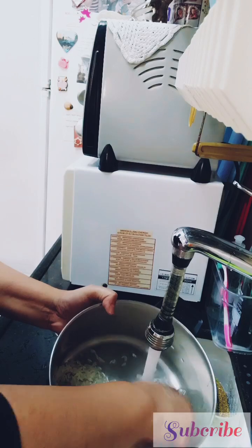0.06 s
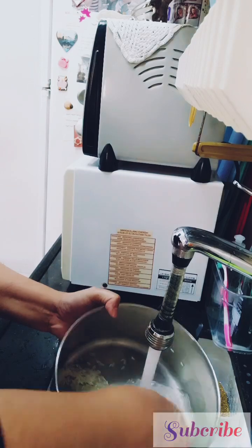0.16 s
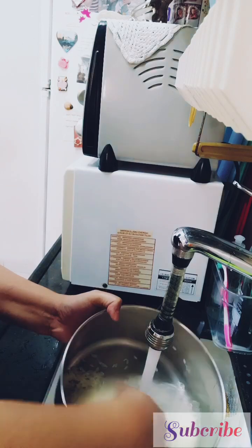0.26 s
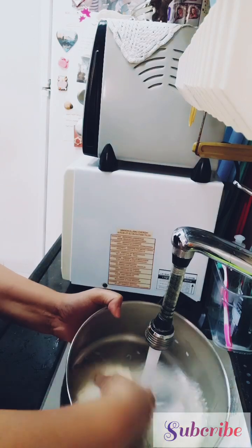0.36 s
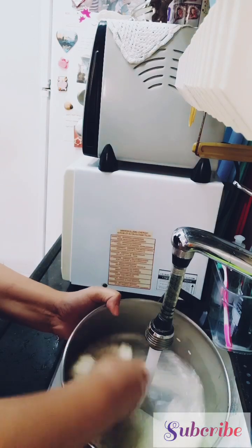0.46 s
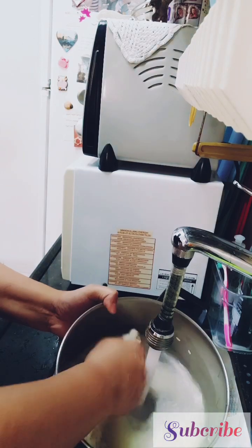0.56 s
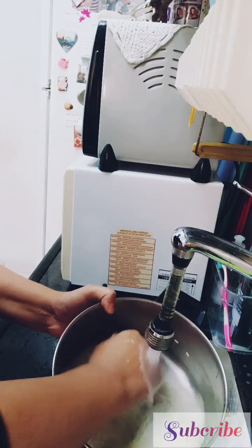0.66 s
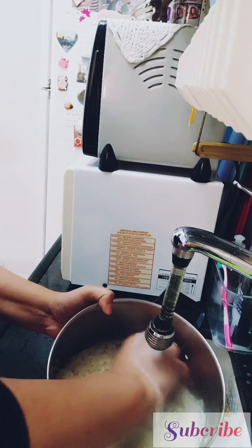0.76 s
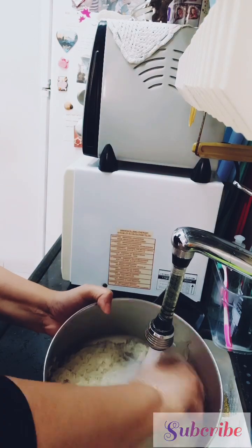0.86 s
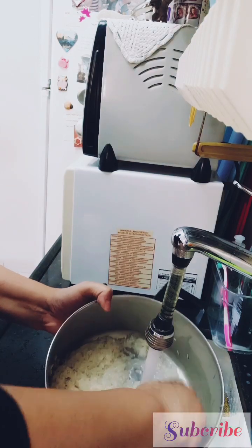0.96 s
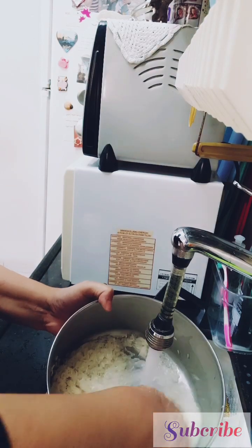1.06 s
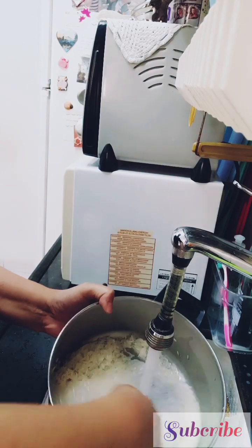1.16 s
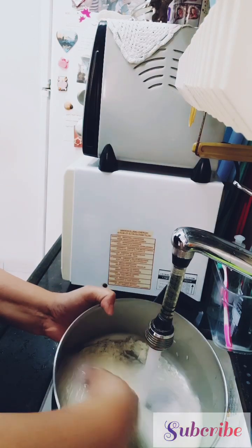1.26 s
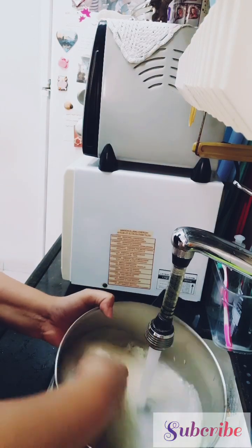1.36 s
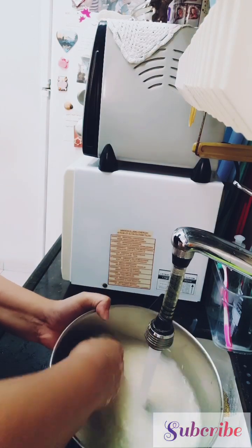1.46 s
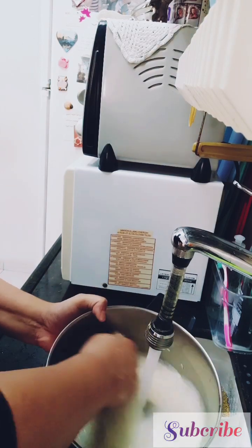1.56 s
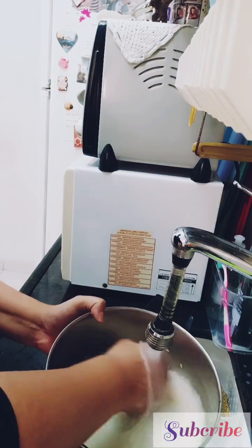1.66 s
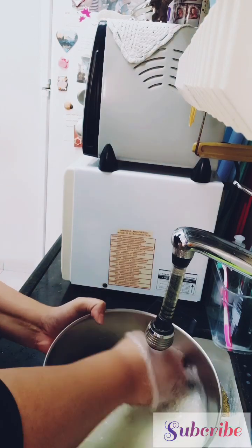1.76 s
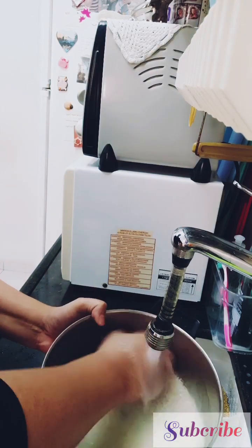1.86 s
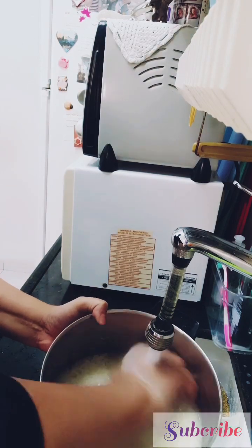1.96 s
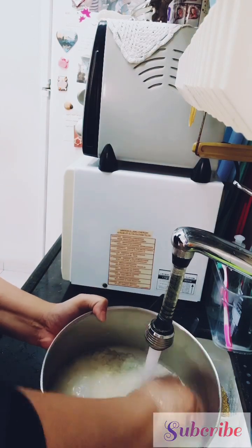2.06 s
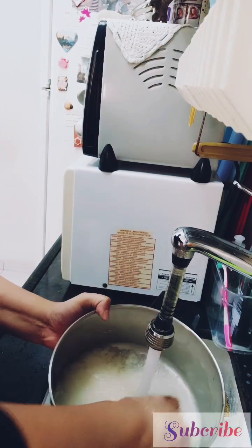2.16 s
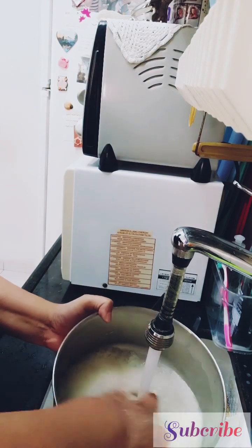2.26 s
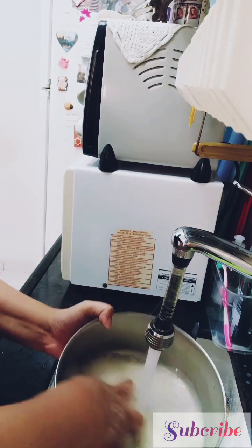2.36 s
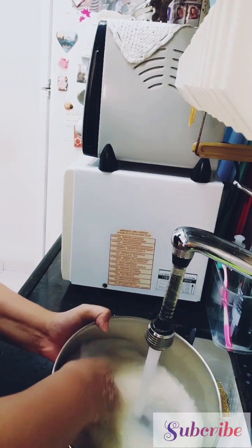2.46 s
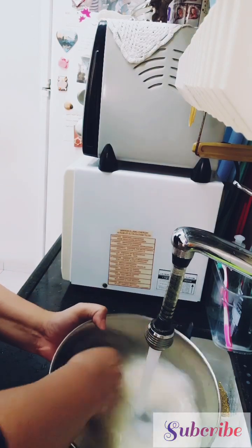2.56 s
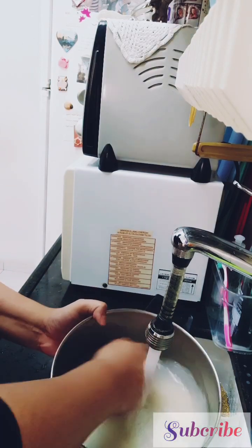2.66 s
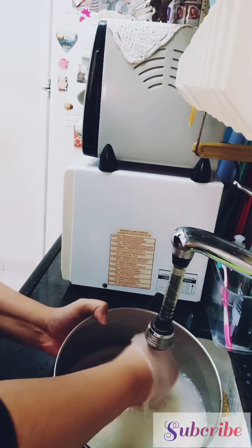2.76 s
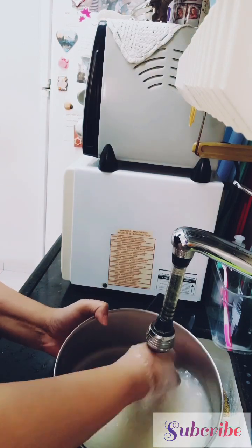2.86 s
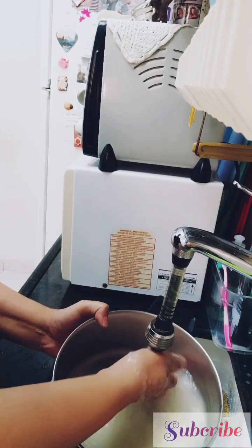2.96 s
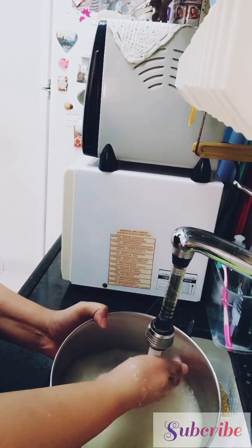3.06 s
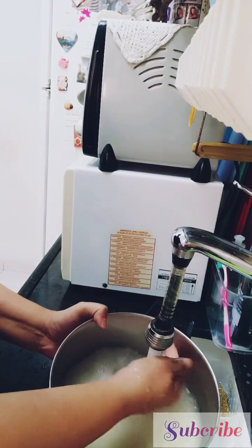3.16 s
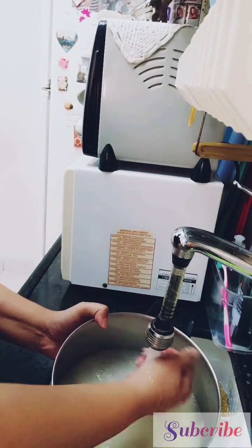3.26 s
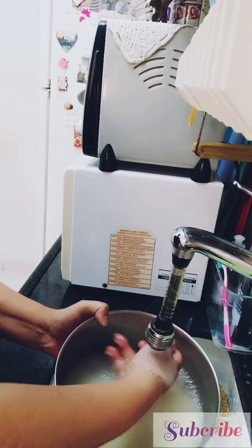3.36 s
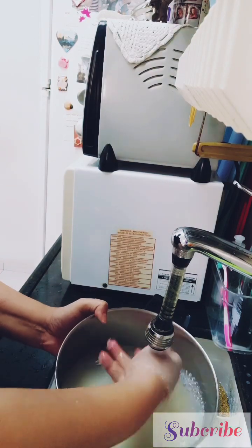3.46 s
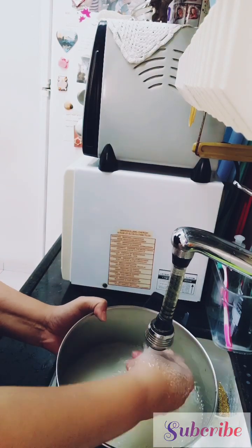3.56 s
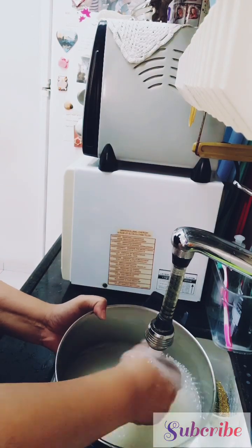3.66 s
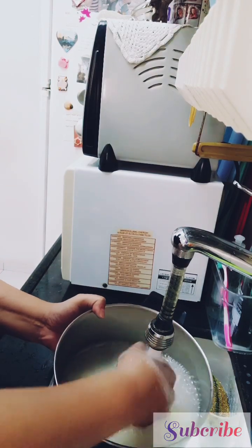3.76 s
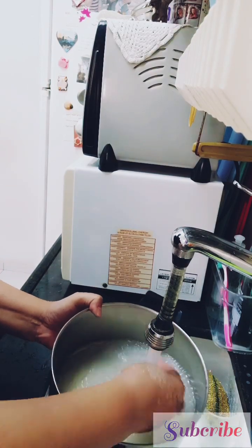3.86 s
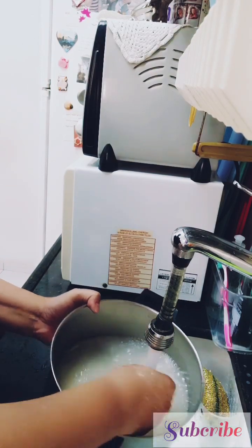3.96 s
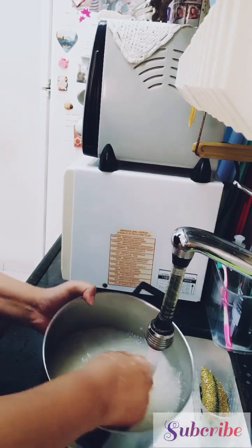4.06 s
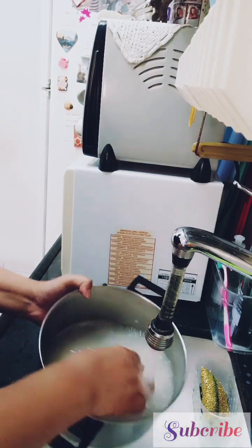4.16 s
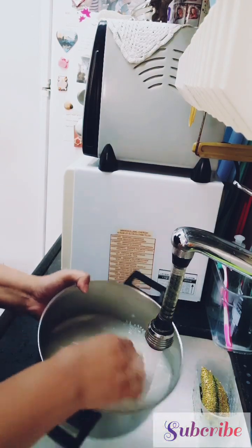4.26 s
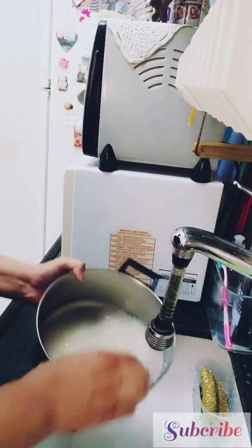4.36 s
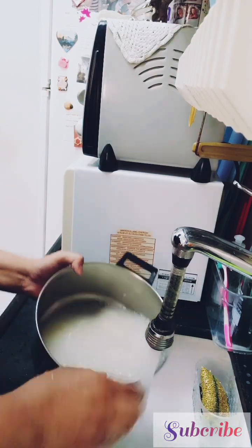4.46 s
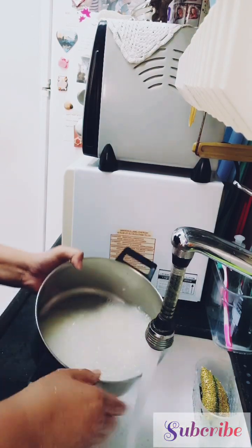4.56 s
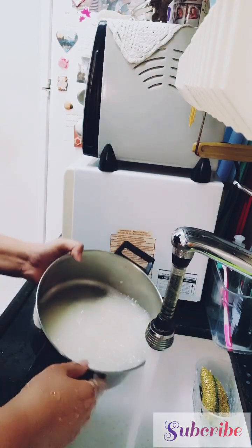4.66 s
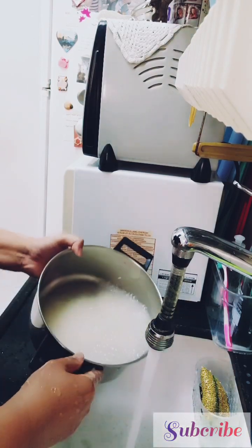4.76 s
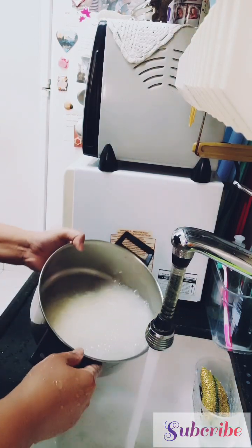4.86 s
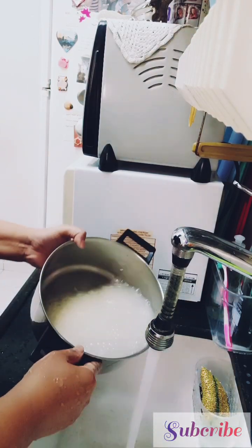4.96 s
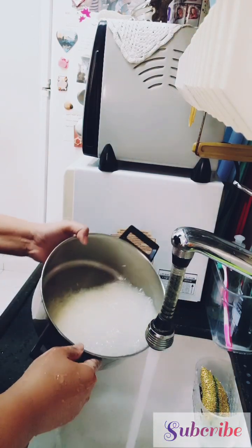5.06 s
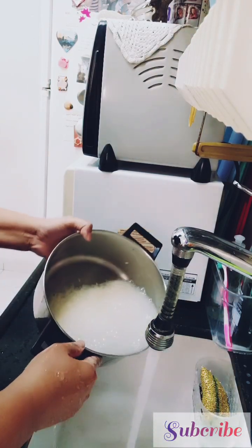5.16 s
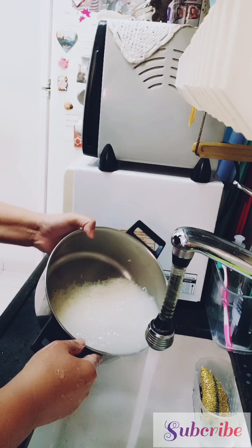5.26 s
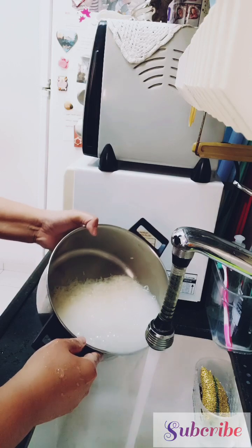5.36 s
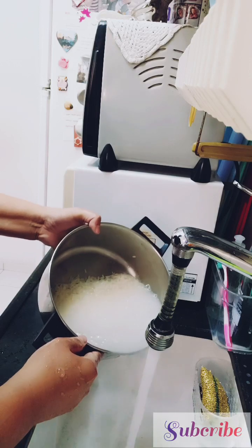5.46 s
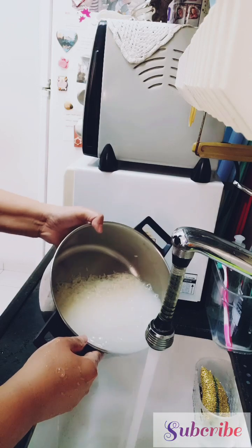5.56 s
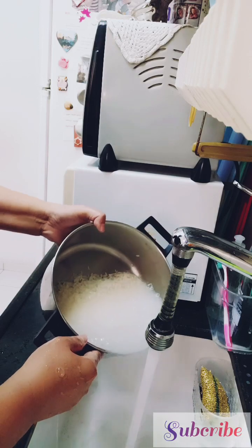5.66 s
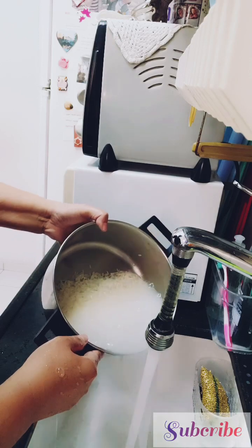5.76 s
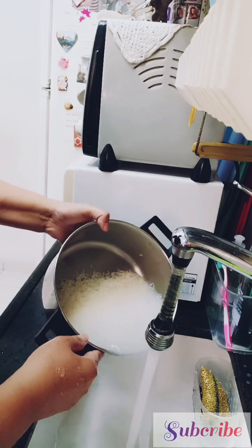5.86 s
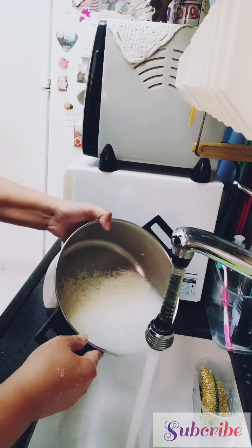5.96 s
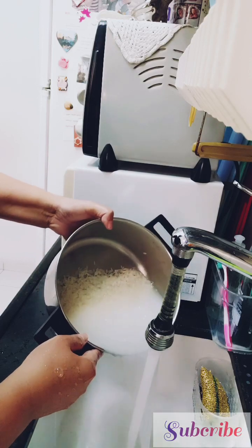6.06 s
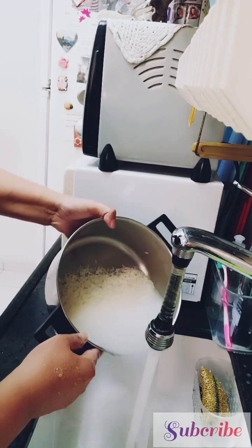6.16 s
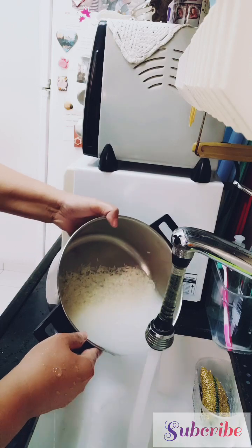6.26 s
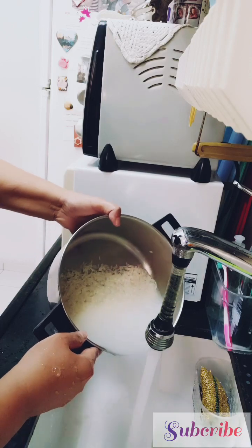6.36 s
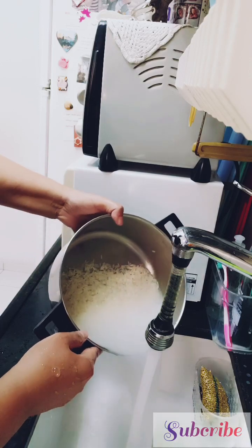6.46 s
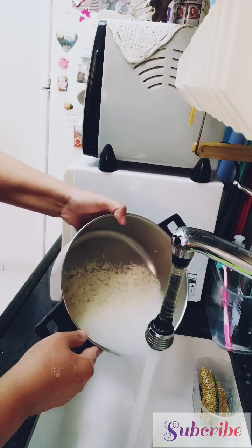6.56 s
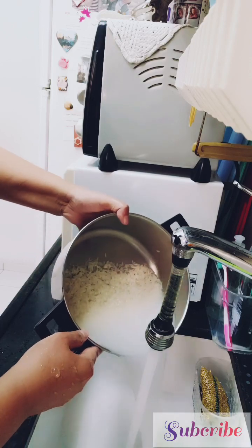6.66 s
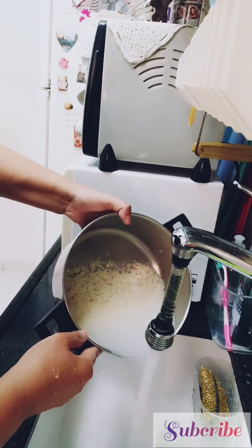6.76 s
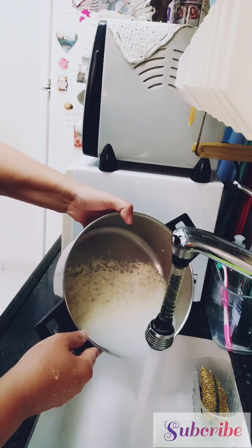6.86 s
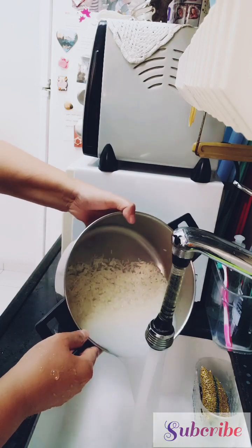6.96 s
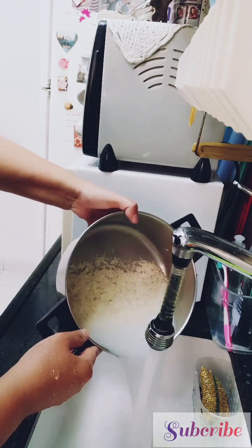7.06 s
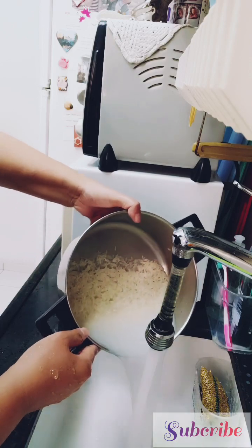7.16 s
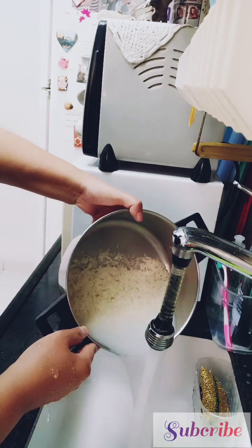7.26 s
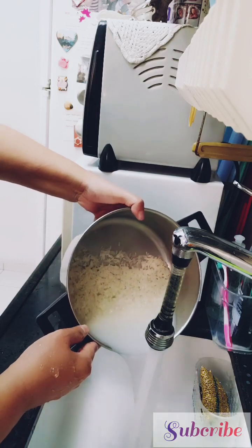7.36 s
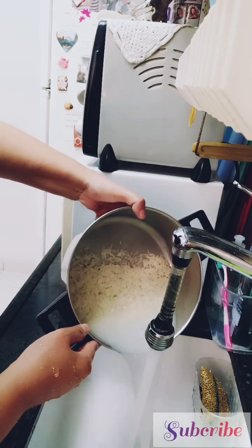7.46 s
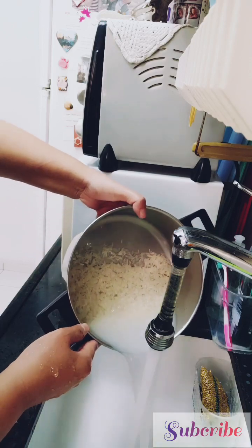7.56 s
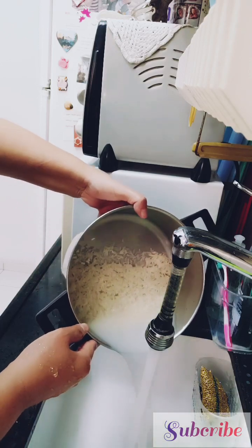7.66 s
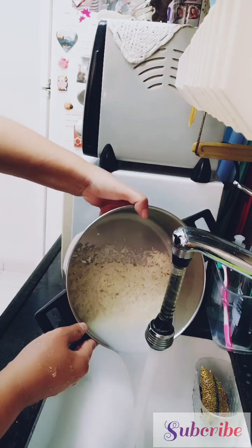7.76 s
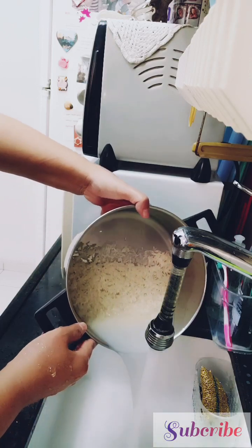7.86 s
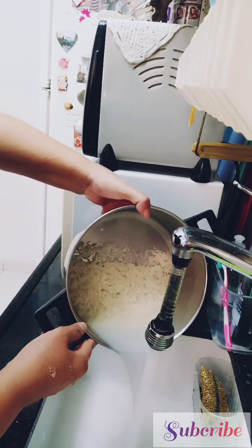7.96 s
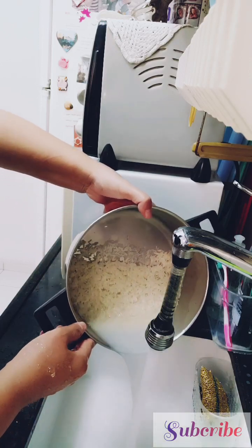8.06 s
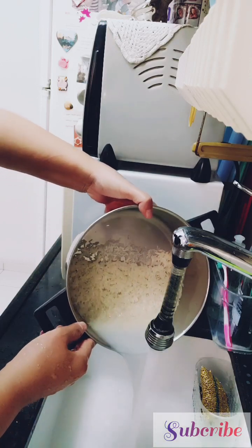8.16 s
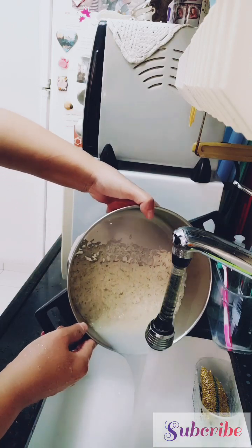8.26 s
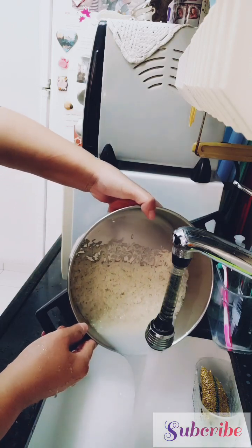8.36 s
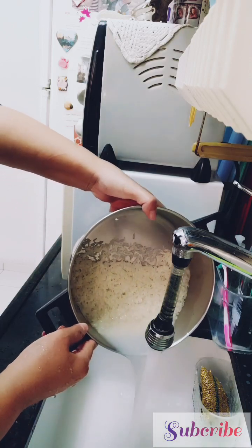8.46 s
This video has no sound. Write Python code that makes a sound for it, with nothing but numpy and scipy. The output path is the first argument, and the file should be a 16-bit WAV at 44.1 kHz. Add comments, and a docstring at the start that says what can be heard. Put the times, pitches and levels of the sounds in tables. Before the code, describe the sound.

Tap water fizzes into a steel pot as a hand swishes rice, then spatters on the sink while the rinse water is poured out.

```python
"""Rinsing rice at the kitchen sink

A tap runs into a steel pot: the jet fizzes and drives bubbles under while a hand swirls the rice.
Then the pot is pulled aside, the jet spatters on the bare sink, and the rinsing water is tipped out
in splattering gushes. Close up, through two small microphone ports, each with its own treble colour."""
import sys
import numpy as np
from scipy import signal
from scipy.fft import rfft, irfft
from scipy.io import wavfile
from scipy.ndimage import uniform_filter1d

SR = 44100
rng = np.random.default_rng(int(sys.argv[2]) if len(sys.argv) > 2 else 0)


def inscribe(sig):
    """Save sig as 16-bit PCM at rate SR to the path in sys.argv[1].

    A 1-D sig is mono; a 2-D sig holds one channel per row.
    Samples are clipped to [-1, 1] before scaling.
    """
    pcm = np.round(np.clip(np.atleast_2d(sig).T, -1, 1) * 32767)
    wavfile.write(sys.argv[1], SR, pcm.astype(np.int16))


N = 374850
TIME = np.arange(N) / SR
JET_LEAVES_POT_S = 4.548

# spectrum of fine spray, from the jet on steel and from splashes: f/Hz, level/dB
FINE_SPRAY = [(500, -44), (1200, -27), (2200, -33), (3000, -17.5), (4200, -11.5), (6300, -5), (8500, -1),
              (11000, 1), (14000, 5), (15500, -2)]
# gushes tipped out of the pot: start t/s, length/s, level/dB
GUSHES = [(6.15, 0.06, -33), (6.27, 0.13, -29.5), (6.72, 0.022, -37), (6.93, 0.3, -33), (7.33, 0.15, -39),
          (7.85, 0.41, -29.5), (7.95, 0.15, -31), (8.27, 0.17, -34)]


def from_db(db):
    """Decibels to gain."""
    return 10 ** (np.asarray(db) / 20)


def rms_one(x):
    """Scale to unit power."""
    return x / np.sqrt(np.mean(x ** 2) + 1e-20)


def gain_curve(points):
    """A gain per sample through (t/s, level/dB) points."""
    return from_db(np.interp(TIME, *np.transpose(points)))


def between(start, end, fade_s):
    """A gate with short ramps."""
    return np.clip((TIME - start) / fade_s + .5, 0, 1) * np.clip((end - TIME) / fade_s + .5, 0, 1)


def swells(rows, attack_s, release_s):
    """Gain of a series of sounds that each rise, hold to the end of their length and die away."""
    return sum(from_db(db) * np.clip((TIME - start) / attack_s, 0, 1)
               * np.exp(-np.maximum(TIME - start - length, 0) / release_s)
               for start, length, db in rows)


def drift(rate_hz, step=32):
    """Smooth random wander of unit power, mostly slower than rate_hz."""
    coarse = TIME[::step]
    hz = np.fft.rfftfreq(len(coarse), step / SR)
    spectrum = rfft(rng.standard_normal(len(coarse))) / (1 + 1j * hz / rate_hz) ** 2
    return np.interp(TIME, coarse, rms_one(irfft(spectrum, len(coarse))))


def colour(x, points, size=4096):
    """Causal (minimum-phase) filter through (f/Hz, level/dB) points."""
    hz, db = np.transpose(points)
    curve = np.interp(np.log(np.fft.rfftfreq(size, 1 / SR) + 1), np.log(hz), db)
    cepstrum = irfft(np.log(from_db(curve)))
    cepstrum[1:size // 2] *= 2
    cepstrum[size // 2 + 1:] = 0
    return signal.oaconvolve(x, irfft(np.exp(rfft(cepstrum))))[:N]


def resonate(x, hz, width_hz):
    """One resonance with gain 1 at its peak."""
    radius = np.exp(-np.pi * width_hz / SR)
    poles = [1, -2 * radius * np.cos(2 * np.pi * hz / SR), radius ** 2]
    return signal.lfilter((1 - radius ** 2) / 2 * np.array([1, 0, -1]), poles, x + 1e-18)


def drops(per_s, spread_db):
    """Impacts of droplets at random moments and of uneven size."""
    sizes = from_db(spread_db * np.clip(rng.standard_normal(N), -2, 2)) * rng.choice([-1, 1], N)
    return rms_one(sizes * (rng.random(N) < per_s / SR))


def bubble_rings(starts, hz, heights, cycles, rise, size=1600):
    """Each bubble rings for some cycles (to -60 dB) and rises in pitch as it nears the surface."""
    turns = hz[:, None] * np.arange(size) / SR
    age = np.minimum(turns / cycles, 2)
    rings = heights[:, None] * from_db(-60 * age) * np.sin(2 * np.pi * turns * (1 + rise * age / 2))
    at = (starts * SR).astype(int)[:, None] + np.arange(size)
    return np.bincount(at.ravel(), rings.ravel(), N)[:N]


def bubbles(low_hz, high_hz, cycles, spread_db, rise, count):
    """A swarm of bubbles of all sizes, with about equal power per Hz."""
    when, pitch, strength = rng.random((count, 3)).T
    hz = low_hz * (high_hz / low_hz) ** pitch
    heights = hz * from_db(spread_db * strength ** 2)
    return rms_one(bubble_rings(when * N / SR, hz, heights, cycles, rise))


def room_tone():
    """Low rumble of the kitchen, nearly alike at both ports except in the deepest bass."""
    # spectrum of the rumble common to both ports: f/Hz, level/dB
    rumble = [(15, -4.5), (25, 8), (43, -4), (75, -10), (108, -2.5), (165, -9), (200, -9.5), (214, -4.5),
              (241, -19), (268, -9.5), (302, -16), (336, -26.5), (420, -11.5), (550, -42), (920, -120)]
    mid = rms_one(colour(rng.standard_normal(N), rumble, size=16384))
    side = rms_one(colour(rng.standard_normal(N), [(30, 3), (100, -12), (400, -18), (900, -40)]))
    return from_db(-54.5) * (mid + from_db(-11) * side * [[1], [-1]])


def echoes(t60, size=8192):
    """Dense dying reflections, different at each port, evenly spread in frequency above the bass."""
    tail = rfft(rng.standard_normal((2, size)) * from_db(-60 * TIME[:size] / t60))
    smooth_power = uniform_filter1d(np.abs(tail) ** 2, 41)
    even = irfft(tail / np.sqrt(smooth_power))[:, :-size // 8]
    return signal.sosfilt(signal.butter(2, 900, "high", fs=SR, output="sos"), even)


def vessel(x, modes, right_lag_s, walls_db, walls_t60, kitchen_db, kitchen_t60):
    """Sound made inside a steel vessel: reflections from its walls and the kitchen, then its air modes."""
    out = np.array([x, np.roll(x, round(right_lag_s * SR))])
    # the water lands now here, now there, and each spot has reflections of its own
    place = 2 * drift(18.2)
    for share in (np.cos(place), np.sin(place)):
        reflections = from_db(walls_db) * echoes(walls_t60) + from_db(kitchen_db) * echoes(kitchen_t60)
        out += signal.oaconvolve((x * share)[None], reflections, axes=1)[:, :N]
    out += sum(from_db([[left], [right]]) * resonate(out, hz, width) for hz, width, left, right in modes)
    return out / np.sqrt(1 + from_db(walls_db) ** 2 + from_db(kitchen_db) ** 2)


def pot(x):
    """The air in the pot rings in narrow modes."""
    # air resonances: f/Hz, width/Hz, left level/dB, right level/dB
    modes = [(435, 27, 3.5, 5), (554, 23, 8.5, 5.5), (670, 19.3, 7, 12.5), (960, 39, 4.5, -10),
             (1090, 23, 0, -1), (1840, 21, 3, -10), (1935, 85, 2.5, 2), (2284, 22, 2.5, -11),
             (2462, 110, 1, -2), (3020, 64, -1, -3)]
    return vessel(x, modes, right_lag_s=.00011, walls_db=1, walls_t60=.047,
                  kitchen_db=2.5, kitchen_t60=.15)


def sink(x):
    """The basin adds strong, short reflections and broad low modes."""
    # air resonances: f/Hz, width/Hz, left level/dB, right level/dB
    modes = [(414, 66, 7, 9), (550, 73, 20, 20.5), (867, 140, 9.5, 11), (1900, 31, 4, -6),
             (2560, 44, 1, -7), (3100, 46, -1, 3), (3495, 30, 2, -5), (3936, 110, 2.5, 4.5),
             (4490, 150, 2, -5), (4780, 58, 4, 8), (6020, 83, -1, -17), (6530, 88, -3.5, -14),
             (8110, 57, -6, -9)]
    return vessel(x, modes, right_lag_s=.00025, walls_db=8, walls_t60=.037,
                  kitchen_db=-1.5, kitchen_t60=.25)


def hand():
    """The stirring hand makes the water gurgle; drops fall from the fingers and ring."""
    # strokes through the water: start t/s, length/s, level/dB
    strokes = [(0.66, 0.31, -52), (1.34, 0.13, -46), (1.68, 0.29, -42.5), (2.1, 0.2, -48),
               (2.43, 0.32, -50), (3.62, 0.31, -52), (3.93, 0.48, -48.5)]
    stirring = from_db(-60.5) + swells(strokes, attack_s=.027, release_s=.035)
    gurgle = bubbles(937, 1760, cycles=24, spread_db=-1.5, rise=.087, count=1000)
    drips = bubbles(2810, 8670, cycles=130, spread_db=6, rise=.02, count=500)
    return stirring * gurgle + from_db(-51.5) * drips


def tinkles(per_s=700, pitch_spread=.074):
    """Tiny like-sized bubbles ring where the jet skims the hand or the fingers break the surface."""
    # showers of bubbles: start t/s, length/s, f/Hz, level/dB
    showers = [(1.164, 0.18, 6800, -35.5), (1.411, 0.06, 6870, -30), (2.38, 0.18, 6950, -36.5),
               (2.728, 0.15, 6900, -51), (2.851, 0.024, 6600, -32.5), (2.913, 0.0046, 7170, -25),
               (3.02, 0.14, 6820, -36), (3.03, 0.062, 5530, -38), (3.242, 0.048, 8950, -34),
               (3.362, 0.12, 6550, -43), (3.72, 0.15, 2500, -46.5), (3.808, 0.024, 6650, -33.5),
               (3.914, 0.015, 7300, -34), (3.97, 0.04, 10200, -39), (4.113, 0.075, 6100, -36.5),
               (4.29, 0.061, 10340, -40)]
    counts = [int(np.ceil(length * per_s)) for _, length, _, _ in showers]
    start, length, centre_hz, level_db = np.repeat(showers, counts, axis=0).T
    when, pitch = rng.random((len(start), 2)).T
    hz = centre_hz * (1 + pitch_spread * (pitch - .5))
    return bubble_rings(start + when * length, hz, from_db(level_db), cycles=122, rise=.01)


def gulps():
    """Air folded under by the hand or by falling water rings as single large bubbles."""
    # air pockets: t/s, level/dB, f/Hz
    pockets = [(1.3994, -31, 1960), (1.712, -28, 1700), (2.154, -30, 1910), (2.5247, -23, 2240),
               (2.7783, -31, 2450), (3.0767, -29.5, 2460), (3.2521, -32, 1493), (4.045, -33, 1825),
               (4.555, -20.5, 2500), (7.3764, -21, 2425), (7.8897, -27, 1870)]
    starts, level_db, hz = np.transpose(pockets)
    rings = bubble_rings(starts, hz, from_db(level_db), cycles=100, rise=.048, size=4000)
    return signal.sosfilt(signal.butter(2, [1000, 3500], "band", fs=SR, output="sos"), rings)


def splashes(attack_s=.00022, t60=.053):
    """A lump of water slaps down, fuller on water than on steel, and throws a burst of fine spray."""
    # single splashes: t/s, spray level/dB, slap level/dB
    landings = [(0.729, -33, -21.5), (0.8715, -19, -27), (1.732, -16, -25), (1.939, -20, -21.5),
                (3.0807, -40, -28), (3.716, -22, -31), (4.1136, -27, -32.5), (4.5523, -19, -17),
                (6.2441, -32, -15), (6.2514, -22, -23), (6.312, -15, -20), (6.4913, -30, -24),
                (6.823, -14, -44), (6.962, -13, -22), (7.0567, -14, -19.5), (7.0936, -28, -18),
                (7.1492, -14, -18.5), (7.201, -16, -29), (7.3467, -19, -18.5), (8.284, -13, -27),
                (8.4727, -28, -24)]
    # spectra of a slap on water and on steel: f/Hz, level/dB
    on_water = [(300, -28), (900, -5), (1500, 8), (2600, 3), (4500, 7), (9000, -14), (15500, -46)]
    on_steel = [(300, -13), (1500, -17), (2400, 3), (4000, 15.5), (6500, 12.5), (9000, 0), (15500, -49)]
    slap_gain, spray_gain = np.zeros((2, N))
    for start, spray_db, slap_db in landings:
        at = slice(int(start * SR), int(start * SR) + SR // 5)
        age = np.maximum(TIME[at] - start, 0)
        burst = (1 - np.exp(-age / attack_s)) * from_db(-60 * age / t60)
        slap_gain[at] += from_db(slap_db) * burst
        spray_gain[at] += from_db(spray_db) * burst
    lump = drops(per_s=4900, spread_db=2.5)
    slap = np.where(TIME < JET_LEAVES_POT_S,
                    rms_one(colour(lump, on_water)), rms_one(colour(lump, on_steel)))
    spray = rms_one(colour(drops(per_s=9000, spread_db=4), FINE_SPRAY))
    return slap_gain * slap + spray_gain * spray


def sink_drumming():
    """Falling water drums on the bottom of the sink."""
    # swells of the drumming: start t/s, length/s, level/dB
    rolls = [(5.55, 0.074, -52), (5.88, 0.06, -52), (6.66, 0.1, -49), (7.42, 0.26, -52.5)]
    hz, width_hz = 183, 74
    drum = rms_one(resonate(resonate(rng.standard_normal(N), hz, width_hz), hz, width_hz))
    return swells(rolls, attack_s=.077, release_s=.12) * drum


def poured_water(flooded):
    """Rinsing water lands in coarse, bubbly clumps; between gushes a trickle runs over the rim."""
    # spectrum of the splatter: f/Hz, level/dB
    splatter = [(300, -24), (800, -43), (1500, -18), (2000, -11), (3000, -5.5), (4500, -1.5), (6500, -2),
                (9000, -3), (15500, -50)]
    clumps = drops(per_s=1600, spread_db=4.5) * from_db(3.1 * drift(58))
    swarm = bubbles(1490, 6830, cycles=120, spread_db=17, rise=.06, count=1200)
    flow = swells(GUSHES, attack_s=.034, release_s=.036) + from_db(-42) * flooded
    return flow * rms_one(colour(clumps + from_db(-10) * swarm, splatter))


def jet_on_sink(flooded):
    """The jet breaks into droplets on bare steel and sputters once poured water runs under it."""
    # the spray, weaker where the pot or the pour gets in its way: t/s, level/dB
    spray_level = [(4.57, -18), (5.4, -18.5), (6.2, -18), (6.25, -23.5), (6.48, -21.5), (6.6, -19),
                   (6.76, -17.5), (6.81, -33), (6.92, -26), (7.0, -24.5), (7.2, -24.5), (7.32, -26),
                   (7.37, -21), (7.85, -18), (8.33, -22), (8.38, -24), (8.5, -28.5)]
    # spectrum of the wash on the wetted steel: f/Hz, level/dB
    wash_colour = [(200, -9), (500, -10), (700, -7), (950, -4.5), (1200, -1), (1700, 7.5), (2400, 8.5),
                   (3200, -1), (5000, -17.5), (9000, -26)]
    sputter_db = 2 * flooded * drift(60)
    spatter = drops(per_s=9000, spread_db=2.5) * from_db(3.5 * drift(200) + sputter_db)
    spray = gain_curve(spray_level) * rms_one(colour(spatter, FINE_SPRAY))
    wash = from_db(-47.5) * rms_one(colour(rng.standard_normal(N), wash_colour))
    return (spray + wash) * between(JET_LEAVES_POT_S, np.inf, fade_s=.032)


def jet_in_pot(usual_force_db=-36.5, usual_churning_db=-40.5):
    """The aerated jet fizzes at the surface, churns up small bubbles and drives large ones deep."""
    # how hard the jet hits the water: t/s, level/dB
    force_level = [(0.0, -35.5), (0.27, -31.5), (0.49, -28), (0.8, -33), (0.98, -35), (1.4, -30),
                   (1.72, -33), (2.36, -33), (2.92, -40), (3.61, -44), (3.81, -40.5), (4.5, -44)]
    # how much it churns, less once the hand stays under it: t/s, level/dB
    churning_level = [(0.0, -36.5), (0.35, -34.5), (0.9, -34), (2.34, -34.5), (2.39, -43.5), (2.85, -46.5),
                      (3.55, -44), (3.75, -42.5), (4.5, -47.5)]
    # the hand crosses the jet, so less air goes under: start t/s, end t/s, level change/dB
    crossings = [(0.678, 0.952, -3.5), (1.66, 1.92, -5), (2.763, 3.097, -4.5), (3.7, 4.199, -5.5)]
    # spectra of the surface fizz, the small bubbles and the deep ones: f/Hz, level/dB
    fizz_colour = [(500, -24), (1500, -3.5), (3000, -8.5), (5000, -0.5), (7000, -0.5), (10000, 1),
                   (15500, 0.5)]
    churn_colour = [(350, -20), (830, -15.5), (1050, -8), (1400, -2), (2000, -3.5), (3000, -2), (5000, 0),
                    (9000, -23.5), (15500, -45)]
    plunge_colour = [(150, -11.5), (320, -10), (430, -3.5), (580, 8.5), (700, 3), (830, -6.5), (1500, -45)]
    force = gain_curve(force_level) / from_db(usual_force_db)
    churning = gain_curve(churning_level) / from_db(usual_churning_db)
    shield = from_db(sum(db * between(start, end, fade_s=.072) for start, end, db in crossings))
    droplets = drops(per_s=9800, spread_db=1) * from_db(2.15 * drift(55))
    froth = bubbles(1390, 8300, cycles=33, spread_db=25, rise=.062, count=2500)
    froth += from_db(8.5) * drops(per_s=4000, spread_db=2.5)
    deep = bubbles(292, 884, cycles=14, spread_db=2.5, rise=.084, count=5000)
    fizz = from_db(-31) * force * rms_one(colour(droplets, fizz_colour))
    # each exponent is the share of a swing in dB that the layer follows
    churn = from_db(-37.5) * churning ** .72 * shield ** .098 * rms_one(colour(froth, churn_colour))
    plunge = from_db(-51.5) * churning ** .88 * shield * rms_one(colour(deep, plunge_colour))
    return fizz + churn + plunge


def scene():
    """The water sounds in the pot while it is under the tap, and in the sink afterwards."""
    lumps = splashes() + gulps()
    over_pot = between(-1, JET_LEAVES_POT_S, fade_s=.004)
    rinsing = (jet_in_pot() + hand()) * between(-1, JET_LEAVES_POT_S, fade_s=.0063)
    in_pot = rinsing + tinkles() + lumps * over_pot
    flooded = between(GUSHES[0][0], np.inf, fade_s=.21)
    in_sink = jet_on_sink(flooded) + poured_water(flooded) + sink_drumming() + lumps * (1 - over_pot)
    return pot(in_pot) + sink(in_sink) + room_tone()


def record(dry):
    """Each port colours the treble; the deepest bass is thinned, peaks are rounded and the top is cut."""
    # responses of the two microphone ports: f/Hz, level/dB
    left_port = [(1000, 1.5), (3500, 4), (5300, 1), (6100, 9), (6850, 12), (7500, 4), (8500, -7),
                 (10200, 7.5), (12200, 1.5), (14000, 7), (15300, 7.5)]
    right_port = [(1000, 1.5), (3500, 2), (5200, -4.5), (6700, -3.5), (7600, -2), (8500, 2.5), (10000, 1),
                  (11800, -1.5), (13500, -52), (15500, -3)]
    heard = np.array([colour(dry[0], left_port), colour(dry[1], right_port)])
    heard = signal.sosfilt(signal.butter(1, 32, "high", fs=SR, output="sos"), heard)
    heard = 1.1 * np.tanh(heard / 1.1)
    return signal.sosfilt(signal.ellip(12, .2, 80, 15950, fs=SR, output="sos"), heard)


dry = scene()
out = record(dry)
inscribe(out)
```